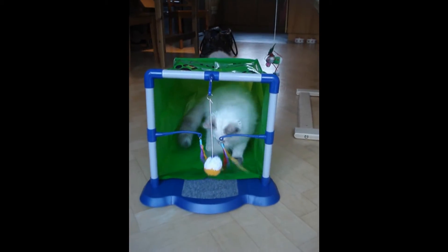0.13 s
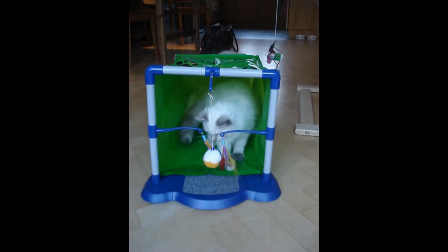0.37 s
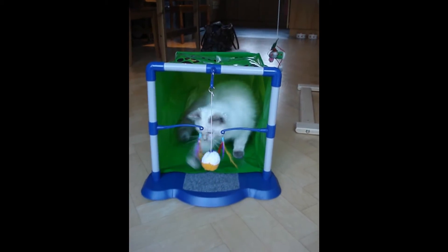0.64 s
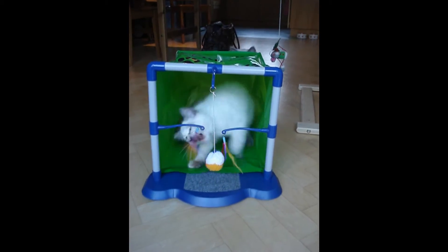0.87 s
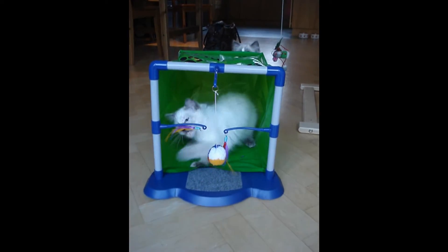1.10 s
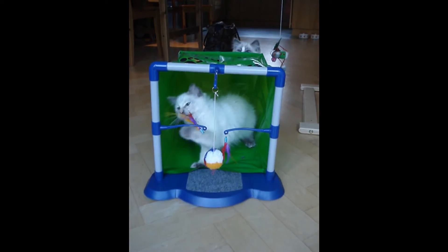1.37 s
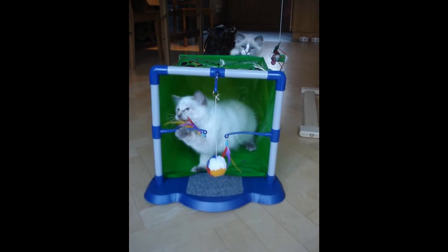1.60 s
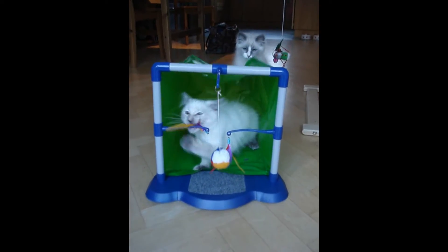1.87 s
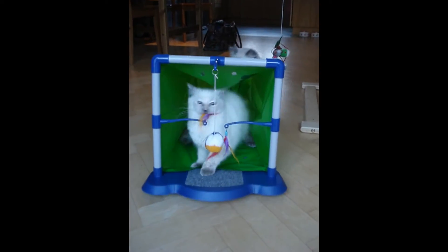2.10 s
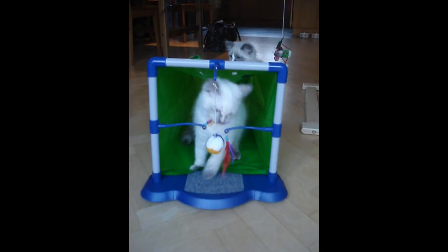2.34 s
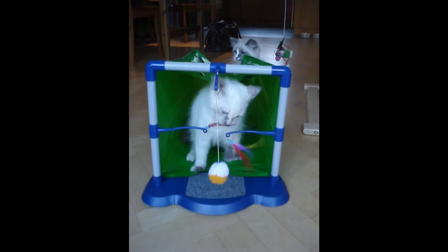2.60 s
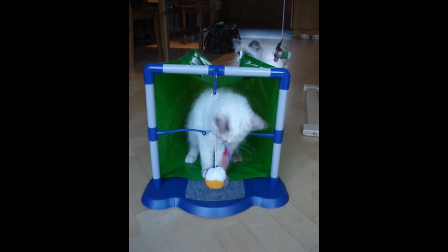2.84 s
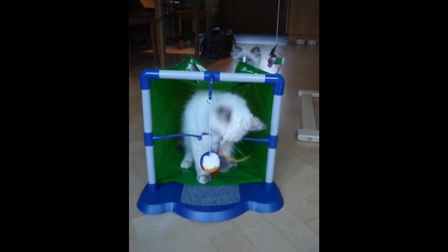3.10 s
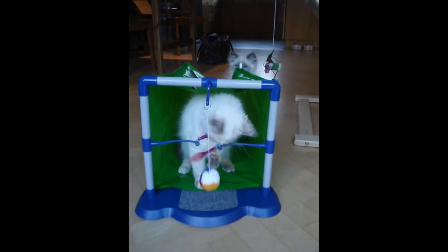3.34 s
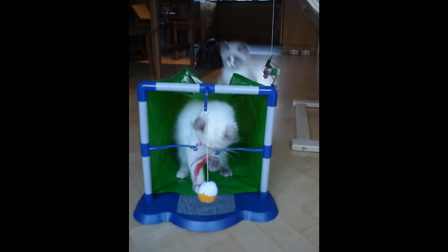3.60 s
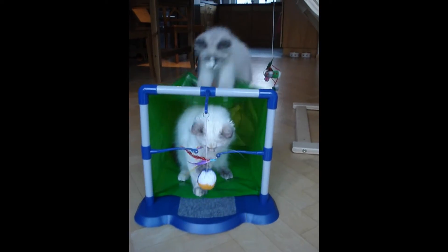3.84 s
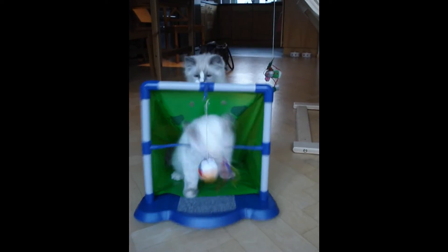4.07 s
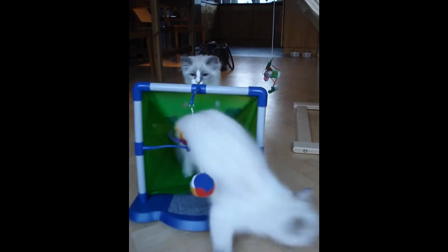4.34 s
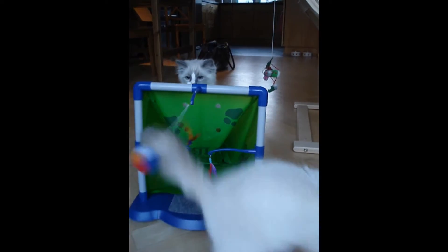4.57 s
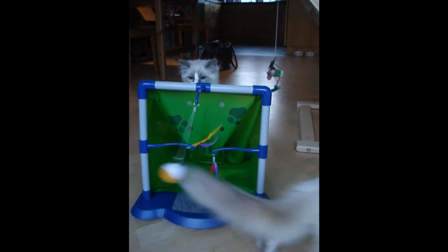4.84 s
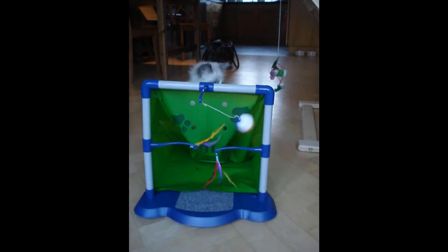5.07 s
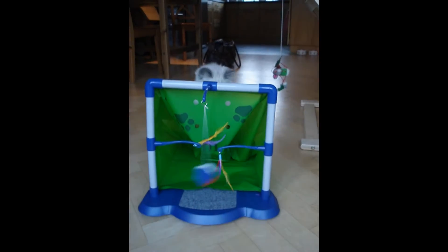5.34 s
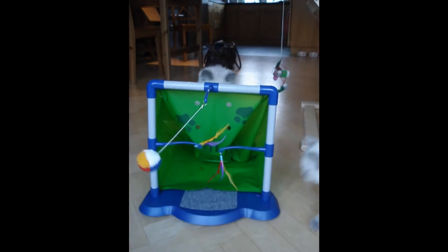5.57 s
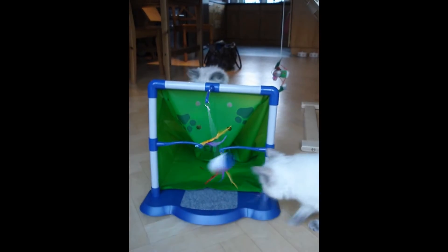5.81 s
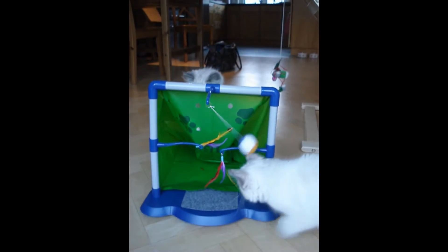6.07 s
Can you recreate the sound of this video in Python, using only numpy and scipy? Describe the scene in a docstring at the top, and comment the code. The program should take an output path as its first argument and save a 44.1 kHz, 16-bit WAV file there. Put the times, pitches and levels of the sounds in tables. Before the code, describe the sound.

Irregular hollow plastic knocks, dry clicks and scrabbling paws, a quiet pause, a loud clatter with soft thumps, a short skid, a few final taps.

```python
"""A kitten bats and scrambles in a hollow plastic play frame on tiles: first knocks, each a contact force
that cracks and rings tube modes, amid scrabbling built of many small contacts; then a side arm jiggles.
Denser batting follows, with dry joint snaps and a ball tap of close modes; after a lull comes the loudest
scramble, with low thumps of body weight. A paw skids in rising and hissing noise; last taps and snaps end it.
A hard room adds a decaying noise tail throughout, over shaped microphone hiss and a faint wavering hum."""
import sys
import numpy as np
from scipy import signal
from scipy.fft import rfft, irfft, next_fast_len
from scipy.io import wavfile
from scipy.ndimage import uniform_filter1d

SR = 44100
rng = np.random.default_rng(int(sys.argv[2]) if len(sys.argv) > 2 else 0)


def natural_amplitude(level_db):
    """Convert a level in decibels to a linear amplitude factor, elementwise."""
    exponent = np.asarray(level_db, float) / 20
    return 10 ** exponent


def output_pcm(signal):
    """Save a mono or channel-first signal as 16-bit PCM at the path in sys.argv[1].

    Samples are clipped to [-1, 1] before scaling.
    """
    pcm = np.clip(np.atleast_2d(signal).T, -1, 1) * 32767
    wavfile.write(sys.argv[1], SR, np.round(pcm).astype(np.int16))


N = 272979  # samples

# resonant modes of the frame's tubes: [f/Hz, relative level/dB, t60/s]
TUBE_MODES = [(201.4, -7, 0.089), (560, -0.5, 0.034), (687, -10.5, 0.22), (960, -27, 0.045),
              (1203, 18, 0.0056), (1480, -14, 0.044), (2100, -30, 0.023), (2920, 18.5, 0.0032),
              (4020, -5, 0.0086)]
SKID_S = 5.125  # a paw skids on the tiles from this moment on


def level(x, db):
    """Root-mean-square normalisation: scale x to an rms level in dB."""
    return x * natural_amplitude(db) / np.sqrt(np.mean(x ** 2))


def colour(x, points):
    """Zero-phase filtering: multiply the spectrum by a gain drawn through (f/Hz, gain/dB) points."""
    hz, db = np.transpose(points)
    size = next_fast_len(len(x))
    gain = natural_amplitude(np.interp(np.log(np.fft.rfftfreq(size, 1 / SR) + 1), np.log(hz), db))
    return irfft(rfft(x, size) * gain, size)[:len(x)]


def causal(x, points):
    """Minimum-phase filtering: folding the cepstrum of the log gain leaves no pre-ringing."""
    hz, db = np.transpose(points)
    gain = natural_amplitude(np.interp(np.log(np.fft.rfftfreq(2048, 1 / SR) + 1), np.log(hz), db))
    cepstrum = irfft(np.log(gain))
    cepstrum[1:1024] *= 2
    response = irfft(np.exp(rfft(cepstrum[:1024], 2048)))[:1024]
    return signal.fftconvolve(x, response)[:len(x)]


def ring(t, hz, t60):
    """Damped free vibration: a sine that falls 60 dB in t60 seconds."""
    return np.sin(2 * np.pi * hz * t) * np.exp(-np.log(1000) * t / t60)


def add(out, s, x):
    """Superposition: mix x into out from time s."""
    i = int(s * SR)
    out[i:i + len(x)] += x[:N - i]


def walk(rate):
    """Slow random modulation: normal values held 1 / rate s, then smoothed, which narrows their spread."""
    k = int(SR / rate)
    held = np.repeat(rng.standard_normal(N // k + 1), k)
    return uniform_filter1d(held, k // 2 + 1)[:N]


def bout(s, length_s, start_db, end_db, attack=2504, release=893):
    """Exponential envelope, as dB per sample: attack (dB/s), straight drift, release (dB/s)."""
    t = np.arange(N) / SR - s
    drift = np.interp(t, [0, max(length_s, .001)], [start_db, end_db])
    rise = attack * np.maximum(-t, 0)
    fall = release * np.maximum(t - length_s, 0)
    return np.maximum(drift - rise - fall, -120)


def knocks(own_db=8, own_t60=0.031, rise=0.31, far_db=7, room_ring_db=-5, scrape_db=4):
    """Impact excitation: a short rough force gives a dull burst with a crack, and rings the tube modes."""
    # blows: [t/s, peak level/dB, struck part's f/Hz, crack level/dB, hollow ring level/dB]
    blows = [(.83, -42.5, 730, 9, 3.5), (.926, -38.5, 942, 6, -16), (0.969, -36, 750, -4, -14),
             (1.035, -20, 1460, 9.5, -16), (1.039, -20, 1530, -18, 2), (1.045, -21.5, 710, -18, -0.5),
             (1.06, -37, 790, -14, -9), (1.078, -25, 754, 0, -6), (1.087, -23.5, 1550, -4, -6),
             (1.324, -23.5, 1000, 16, -0.5), (1.426, -36.5, 2600, 9, -4), (1.457, -30, 3670, 2.5, -4),
             (1.519, -36, 1500, 1, -3), (1.606, -33.5, 610, -8, 1.5), (1.607, -38.5, 1480, -10, 2),
             (1.709, -38, 4040, 4, -9), (1.921, -29, 1900, -12, 5), (1.932, -24, 535, -15, 31),
             (1.977, -26, 605, -6, 17), (1.998, -24.5, 560, -7, 25), (2.036, -20.5, 960, 7, 2.5),
             (2.066, -23, 800, -8, 6), (2.097, -20, 1330, 18, 17), (2.124, -22, 710, -16, 18),
             (2.152, -20.5, 1660, 0.5, -10.5), (2.143, -24.5, 1070, -10, 9), (2.226, -24.5, 700, 0, 12),
             (2.261, -29, 1026, -21, 5), (2.287, -30, 570, 3, -0.5), (2.315, -28, 1010, 1.5, 1),
             (2.351, -36, 2500, 5, -8), (2.362, -28, 636, -6, 23), (2.384, -34, 910, -1, 9),
             (2.54, -34, 1490, -11, -13), (2.588, -32, 777, -17, 13), (2.6, -26.5, 1390, -1.5, -3),
             (2.615, -27, 647, -4, -3), (2.622, -32, 640, -10, 1), (2.642, -34.5, 560, 9, -5),
             (2.674, -29.5, 610, -1, 8), (2.756, -39, 1200, 9, -8), (2.776, -25.5, 1480, -10, -3),
             (2.796, -31, 680, -13, 7), (2.813, -23, 644, -1, -10), (2.893, -21, 1470, 6.5, -2),
             (2.901, -21, 547, -12, 18), (2.904, -22, 1590, -2, 10), (2.905, -25, 2860, 4, 5),
             (2.912, -26.5, 540, -17, 19), (2.915, -23.5, 1000, -9, 21), (2.941, -28, 525, -11, 18),
             (2.948, -29, 1460, 2, -10), (2.98, -31.5, 860, -3, 5), (3.037, -34.5, 1020, 1, 9),
             (3.054, -36, 1030, -10, 2), (3.143, -35, 560, -5, 18), (3.289, -43, 816, 11, 3),
             (3.722, -39.5, 990, 8, 5), (3.751, -33.5, 2900, 1.5, -3), (3.862, -35, 4460, 4.5, -8),
             (3.9345, -26.5, 900, -23, 6), (3.968, -12, 2020, -7, 3), (3.989, -15, 560, -15, 10),
             (4.06, -14, 640, -22, 0.5), (4.073, -13.5, 695, -14, 18), (4.091, -15, 1040, -10, 0),
             (4.099, -10, 1157, -10, 5), (4.113, -20, 1070, -3.5, 3), (4.148, -15, 1310, 6, -10),
             (4.183, -15.5, 1130, 1, -4), (4.217, -16, 1380, 11, -13), (4.33, -17.5, 1730, 15, 6.5),
             (4.355, -20.5, 866, 7, -5), (4.377, -21.5, 1620, -20, 11), (4.389, -19, 716, -10, 9),
             (4.404, -21.5, 1570, -2, -9), (4.432, -23.5, 910, 12, -3), (4.447, -25.5, 805, -20, 4),
             (4.484, -17.5, 1180, 1, 2), (4.505, -15, 2910, 7.5, -9.5), (4.515, -22, 914, -3, -5),
             (4.531, -16, 1110, 9, -4.5), (4.542, -16, 1080, -9, 0), (4.574, -19, 615, 5, 0.5),
             (4.598, -24.5, 880, -4, 2), (4.612, -26, 1190, 9, -4), (4.624, -20.5, 720, -4, 3),
             (4.655, -17.5, 960, 8.5, -2.5), (4.677, -19, 800, 10, -2), (5.079, -32.5, 286, -1, 6),
             (5.095, -41, 1600, -14, -2), (5.125, -40, 356, -15, 15), (5.143, -35, 430, -15, 16),
             (5.238, -37.5, 2540, -3, -9), (5.937, -33, 2900, 16, 7), (5.953, -40.5, 900, -8, 14),
             (5.968, -39, 970, -11, 5), (5.9867, -35, 1500, -3, -8), (5.994, -35, 780, -16, 10),
             (6.079, -40.5, 785, 0, 19)]
    # spectrum of the burst: [f/Hz, gain/dB]
    burst_gain = [(59, -64.5), (100, -11.5), (338, -15), (641, 1.5), (1170, -12), (1500, -2.5),
                  (4190, -10.5), (8570, -21), (10200, -37.5), (13300, -99), (22000, -120)]
    # decay time of the contact at 0 dB of ring; each halving_db more ring halves it
    contact_s, halving_db = 0.0043, 16.5
    scatter_db = 2.5  # spread of the tube modes from blow to blow
    near, spread, t = np.zeros(N), np.zeros(N), np.arange(4096) / SR
    chance = rng.standard_normal((len(blows), len(t) + len(TUBE_MODES)))
    high = signal.butter(2, 2800, "high", fs=SR, output="sos")
    touch = 1. * (t == 0)
    # a padded paw or soft ball builds the ring up over a couple of cycles
    swell = np.minimum(t / .0016, 1)

    def voice(force, blow, modes, crack_db, hollow_db):
        """Linear response: the rough contact force gives burst and crack, the blow excites the modes."""
        burst = level(causal(force, burst_gain), 0)
        crack = (natural_amplitude(crack_db) - 1) * signal.sosfilt(high, burst)
        hollow = level(signal.fftconvolve(blow, modes)[:len(t)], hollow_db)
        return burst + crack + hollow

    for (s, db, hz, crack_db, hollow_db), row in zip(blows, chance):
        # cleaner, more hollow blows have a shorter contact
        tau = contact_s * 2 ** (-hollow_db / halving_db)
        contact = row[:len(t)] * np.exp(-t / tau) * np.minimum(t / (rise * tau), 1)
        modes = natural_amplitude(own_db) * ring(t, hz, own_t60)
        # modes near the struck part's pitch answer most
        for (f, mode_db, t60), c in zip(TUBE_MODES, row[len(t):]):
            gain_db = mode_db + scatter_db * c - far_db * abs(np.log2(f / hz))
            modes = modes + natural_amplitude(gain_db) * ring(t, f, t60)
        # the first touch rings the modes cleanly, the scrape after it keeps feeding them
        blow = level(touch, 0) + level(contact, scrape_db - 2 * hollow_db)
        hit = voice(contact, blow, swell * modes, crack_db, hollow_db)
        hit = natural_amplitude(db) * hit / np.abs(hit).max()
        add(near, s, hit)
        # the walls receive all directions at once: same energy, smooth spectrum, ring changed by room_ring_db
        smooth = voice(touch, touch, modes, crack_db, hollow_db + room_ring_db)
        add(spread, s, smooth * np.sqrt(np.sum(hit ** 2) / np.sum(smooth ** 2)))
    return near, spread


def scrabble(rate=260, denser=0.45, spread=0.9, own_db=5, grain_s=0.003, tubes_db=-11):
    """Random impulse process: uneven rough contacts over steady rubbing; some of it rings the tubes."""
    # bouts of scrabbling: [t/s, length/s, relative level at start/dB, at end/dB, treble gain/dB]
    bouts = [(0.937, 0.047, -66, -37.5, 5.5), (1.011, 0.014, -37, -34, -11), (1.031, 0.05, -28, -31, -10),
             (1.1, 0.077, -40.5, -47, 5.5), (1.314, 0.034, -44, -39.5, -5), (1.447, 0.19, -41.5, -56, 5),
             (1.666, 0.061, -44.5, -50, 5), (1.886, 0.037, -54, -28, -10), (1.921, 0.055, -28, -39, -9),
             (2.003, 0.02, -33, -31.5, -4), (2.039, 0.013, -23.5, -23, -0.5), (2.067, 0.013, -23, -25, -4),
             (2.074, 0.15, -35, -31, 0.5), (2.252, 0.26, -39.5, -45, -3), (2.567, 0.073, -47, -32, -5),
             (2.646, 0.064, -36, -42.5, 2), (2.752, 0.076, -38.5, -35, -20),
             (2.899, 0.018, -22, -32.5, -15), (2.954, 0.15, -55, -51, 8), (3.456, 0.37, -54.5, -62, 8),
             (3.854, 0.023, -66, -57, -13), (3.946, 0.012, -19, -14, 7.5), (3.964, 0.096, -16, -14, 3.5),
             (4.075, 0.12, -17, -21.5, 5.5), (4.212, 0.02, -19.5, -18.5, 5.5), (4.236, 0.044, -26, -26, 5),
             (4.272, 0.16, -29, -26, 3), (4.416, 0.054, -23.5, -32, -4), (4.484, 0.016, -26, -25, -8),
             (4.507, 0.011, -16, -21.5, 4.5), (4.527, 0.02, -19, -21.5, 0), (4.55, 0.054, -22, -29, -3),
             (4.598, 0.031, -34, -22.5, -3), (4.672, 0.17, -28.5, -52.5, 5), (5.35, 0.091, -42.5, -55, 1),
             (5.943, 0.03, -50, -46, -14), (5.99, 0.11, -40, -53.5, 1)]
    # spectrum of the contacts: [f/Hz, gain/dB]
    contact_gain = [(53, -37), (90, -48.5), (199, -4.5), (405, -10), (567, 3), (912, -2), (1160, 1),
                    (1330, 3), (4530, -8.5), (7730, -17.5), (10200, -29), (13300, -84.5), (22000, -120)]
    t = np.arange(4096) / SR
    levels_db = np.array([bout(*row[:-1]) for row in bouts])
    loud_db = levels_db.max(axis=0)
    # the loudest bout of the moment sets the brightness
    bright = natural_amplitude(np.array(bouts)[levels_db.argmax(axis=0), -1])
    # harder scrambling packs the contacts closer, so they merge into a crunch
    crowd = np.maximum(natural_amplitude(denser * (loud_db + 36.5)), 1)
    happens = rng.random(N) < rate * crowd / SR  # rate in contacts per second
    starts = happens * natural_amplitude(np.minimum(spread * rng.exponential(size=N), 12))
    # every contact favours its own octaves: folds of cloth are dull, claws are bright
    where, grains = np.flatnonzero(starts), 0
    rub = .45 * crowd ** .25
    for low_hz in 40 * 2. ** np.arange(9):
        own = starts.copy()
        own[where] *= natural_amplitude(np.clip(own_db * rng.standard_normal(N)[where], -18, 6))
        energy = signal.fftconvolve(own ** 2, np.exp(-2 * t / grain_s))[:N]
        force = np.sqrt(np.abs(energy) / crowd)
        band = signal.butter(2, [low_hz, 2 * low_hz], "band", fs=SR, output="sos")
        grains = grains + signal.sosfilt(band, (level(force, 0) + rub) * rng.standard_normal(N))
    modes = sum(natural_amplitude(db) * ring(t, hz, t60) for hz, db, t60 in TUBE_MODES)
    tubes = signal.fftconvolve(grains, modes)[:N]
    broad = level(colour(grains, contact_gain), 0)
    treble = signal.sosfilt(signal.butter(2, 2800, "high", fs=SR, output="sos"), broad)
    return natural_amplitude(loud_db) * (broad + (bright - 1) * treble + level(tubes, tubes_db))


def ball(swell_s=0.002):
    """Modal superposition: a hard toy ball taps the frame and close modes speak at once, gone in a few cycles."""
    # taps: [t/s, peak level/dB, pitch factor of the struck spot]
    taps = [(2.6408, -20, 0.99), (5.242, -35, 1.1), (5.341, -23.5, 0.994), (5.9826, -31, 0.81)]
    # modes of ball and tube together: [f/Hz before the pitch factor, relative level/dB, t60/s]
    ball_modes = [(560, -10, 0.044), (813, -4, 0.039), (1090, 0, 0.016), (1218, 8, 0.013),
                  (1395, -2, 0.018), (2066, -7, 0.014), (2550, -7.5, 0.016), (3090, -2, 0.0084),
                  (3900, -8, 0.0095)]
    out, t = np.zeros(N), np.arange(4096) / SR
    for s, db, pitch in taps:
        modes = sum(natural_amplitude(mode_db) * ring(t, pitch * hz, t60) for hz, mode_db, t60 in ball_modes)
        tap = np.minimum(t / swell_s, 1) * modes
        add(out, s, natural_amplitude(db) * tap / np.abs(tap).max())
    return out


def arm(rise_s=0.004, jiggle_s=0.0067):
    """Forced resonance: the kitten tugs a springy side arm, whose rough jiggle in its joint feeds a few modes."""
    # tugs: [t/s, peak level/dB]
    tugs = [(1.325, -37), (1.343, -51), (1.375, -50), (1.403, -45), (1.428, -37.5), (1.456, -34),
            (1.487, -44), (1.518, -36), (1.554, -48), (1.662, -45), (1.688, -39.5), (1.711, -49),
            (1.733, -60)]
    # modes of the arm: [f/Hz, relative level/dB, t60/s]
    arm_modes = [(635, 0, .06), (945, -.5, .06), (3750, -11, .02)]
    out, t = np.zeros(N), np.arange(4096) / SR
    modes = sum(natural_amplitude(db) * ring(t, hz, t60) for hz, db, t60 in arm_modes)
    for (s, db), row in zip(tugs, rng.standard_normal((len(tugs), len(t)))):
        jiggle = row * np.minimum(t / rise_s, 1) * np.exp(-t / jiggle_s)
        tug = signal.fftconvolve(jiggle, modes)[:len(t)]
        add(out, s, natural_amplitude(db) * tug / np.abs(tug).max())
    return out


def snaps():
    """Heavy damping widens the spectrum: each sharp, dry joint snap is one mode lasting a couple of cycles."""
    # snaps: [t/s, peak level before the high-pass/dB, f/Hz]
    joint_snaps = [(1.9323, -24, 1600), (2.0647, -18.5, 1030), (2.0994, -22, 1360), (2.1555, -20, 1640),
                   (2.9472, -18, 1690), (4.0618, -9.5, 650), (4.1006, -10, 1770), (4.407, -17.5, 1830),
                   (4.5342, -12, 2880), (5.9853, -23, 1870), (5.9936, -31, 780), (6.0088, -31, 860)]
    cycles = 5  # until the snap has fallen 60 dB
    out, t = np.zeros(N), np.arange(1024) / SR
    for s, db, hz in joint_snaps:
        snap = ring(t, hz, cycles / hz)
        add(out, s, natural_amplitude(db) * snap / np.abs(snap).max())
    return signal.sosfilt(signal.butter(2, 250, "high", fs=SR, output="sos"), out)


def swish():
    """Friction noise: the skidding paw's hiss is soft, slightly uneven broadband rubbing."""
    # spectrum of the hiss: [f/Hz, gain/dB]
    hiss_gain = [(350, -20.5), (600, 0), (887, -10), (976, -4), (1330, 3), (2030, -11.5), (6980, -2.5),
                 (10200, -19.5), (13300, -51), (22000, -120)]
    uneven_db = 1.5 * walk(60)
    envelope_db = bout(SKID_S, length_s=0.034, start_db=-46.5, end_db=-48, attack=630, release=146)
    return natural_amplitude(envelope_db + uneven_db) * level(colour(rng.standard_normal(N), hiss_gain), 0)


def skid(width_hz=170, uneven_db=2):
    """Narrow-band noise on a gliding carrier: the skidding paw's lumpy low resonance rises as it slides."""
    start_hz, rise_hz_per_s = 409, 1400
    hz = start_hz + rise_hz_per_s * (np.arange(N) / SR - SKID_S)
    phase = 2 * np.pi * np.cumsum(hz) / SR
    low = signal.butter(2, width_hz / 2, fs=SR, output="sos")
    a, b = signal.sosfilt(low, rng.standard_normal((2, N)))
    envelope_db = bout(SKID_S, length_s=0.055, start_db=-50, end_db=-52, attack=450, release=420)
    rumble = level(a * np.cos(phase) + b * np.sin(phase), 0)
    return natural_amplitude(envelope_db + uneven_db * walk(80)) * rumble


def thumps():
    """Low damped resonance: body weight landing on the floor, each a slow push with a soft onset."""
    # landings: [t/s, level before onset and decay/dB, f/Hz]
    landings = [(3.943, -35, 70), (3.98, -34, 60), (4.05, -29, 50), (4.09, -34, 75), (4.125, -36, 50),
                (4.21, -39, 30), (4.664, -36, 30)]
    t60 = 0.073  # s
    out, t = np.zeros(N), np.arange(SR // 4) / SR
    for s, db, hz in landings:
        add(out, s, natural_amplitude(db) * ring(t, hz, t60) * np.minimum(t / 0.004, 1))
    return out


def room(x):
    """Diffuse reverberation: octave bands of noise decay exponentially, soonest at the top, after a fast onset."""
    # reverberation time: [f/Hz, t60/s]
    reverberation = [(150, 0.39), (500, 0.67), (1500, 0.81), (4000, 0.48), (9000, 0.028)]
    tail_db, onset_s = -9, 0.00031
    t = np.arange(SR) / SR
    hz, t60 = np.transpose(reverberation)
    tail = 0
    for centre in 62.5 * 2. ** np.arange(8):
        band = signal.butter(2, [centre / 2 ** .5, centre * 2 ** .5], "band", fs=SR, output="sos")
        decay = np.exp(-np.log(1000) * t / np.interp(np.log(centre), np.log(hz), t60))
        tail = tail + signal.sosfilt(band, rng.standard_normal(SR)) * decay
    tail = tail * (1 - np.exp(-t / onset_s))
    return signal.fftconvolve(x, natural_amplitude(tail_db) * tail / np.sqrt(np.sum(tail ** 2)))[:N]


def background():
    """Stationary noise and a tone: slightly unsteady microphone hiss with a wavering mains hum."""
    # spectrum of the hiss: [f/Hz, gain/dB]
    noise_gain = [(12, -51), (20, -17), (70, -11), (106, -4.5), (204, -2), (495, -3.5), (594, -3.5),
                  (659, -6.5), (732, -3.5), (856, -5), (1170, -8.5), (2700, -11), (10200, -24.5),
                  (13300, -103.5), (22000, -120)]
    hiss = level(colour(rng.standard_normal(N), noise_gain), -54)
    unsteady = natural_amplitude(.6 * walk(6))
    hum_db, hum_hz = -67.5, 119.5
    hum = natural_amplitude(hum_db + 2 * walk(12)) * np.sin(2 * np.pi * hum_hz * np.arange(N) / SR)
    return hiss * unsteady + hum


def scene():
    """Superposition of direct sound, reverberation and background."""
    # light plastic radiates little bass
    thin = signal.butter(2, 110, "high", fs=SR, output="sos")
    hits, spread, rattle = signal.sosfilt(thin, [*knocks(), natural_amplitude(-6.0) * scrabble()])
    paw = swish() + skid()
    taps = ball() + arm() + snaps()
    # tubes and cloth sound from different spots, so each has its own pattern of reflections
    frame = hits + taps + room(spread + natural_amplitude(-4) * taps)
    kitten = rattle + room(rattle + natural_amplitude(-9.0) * paw) + paw + thumps()
    return (frame + kitten + background())[None]


def band_limit(x):
    """A steep low-pass at the top of the band."""
    return signal.sosfilt(signal.butter(12, 10450, fs=SR, output="sos"), x)


def record(dry):
    """Saturation and band limiting: the camera rounds the loudest peaks and cuts the top."""
    soft = np.tanh(1.255 * dry) / 1.387
    top_hz = 10280
    low_pass = signal.ellip(12, .2, 90, top_hz, fs=SR, output="sos")
    return band_limit(signal.sosfilt(low_pass, soft))


dry = scene()
out = record(dry)
output_pcm(out)
```